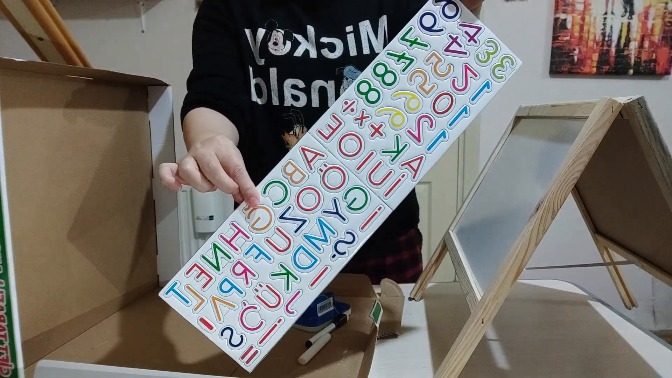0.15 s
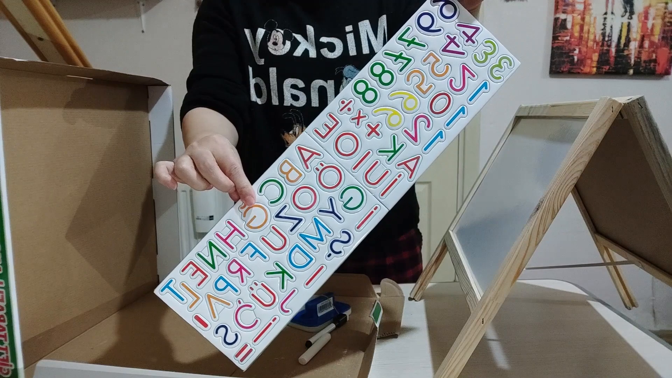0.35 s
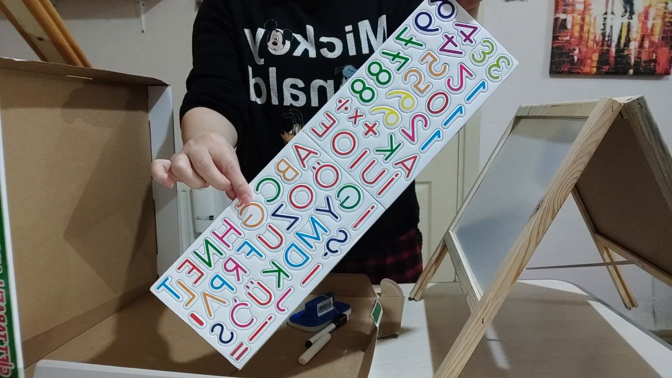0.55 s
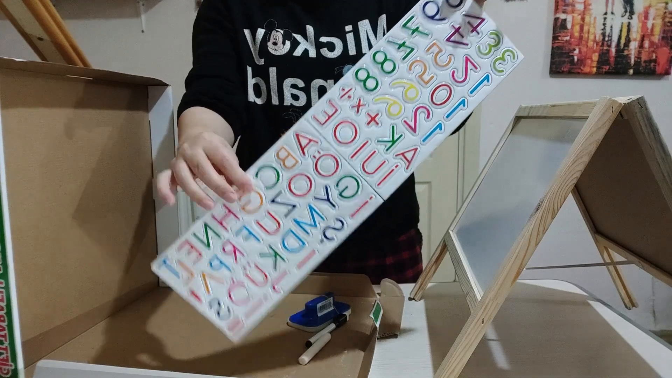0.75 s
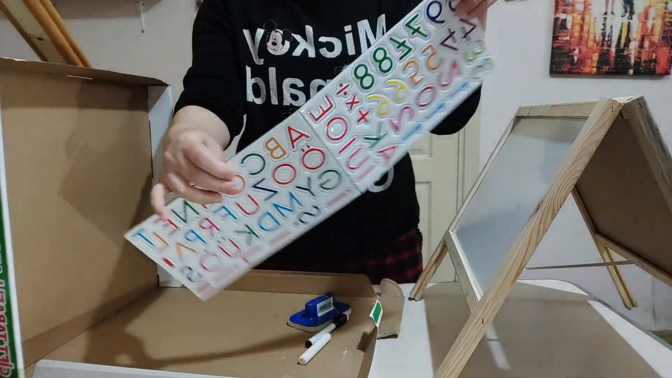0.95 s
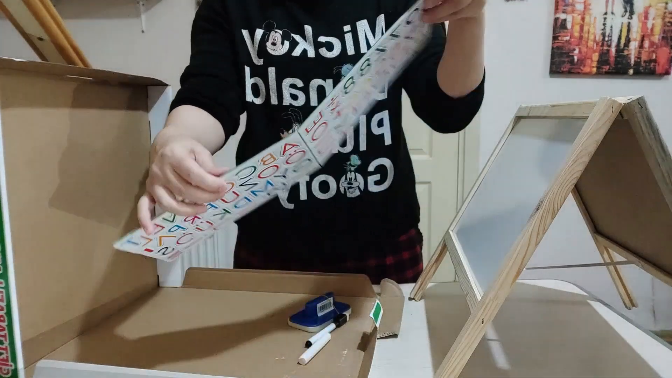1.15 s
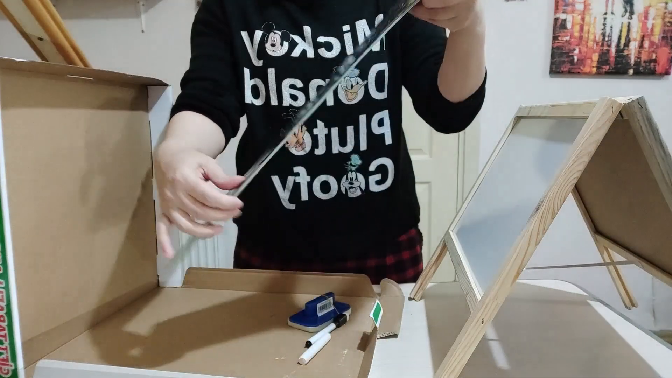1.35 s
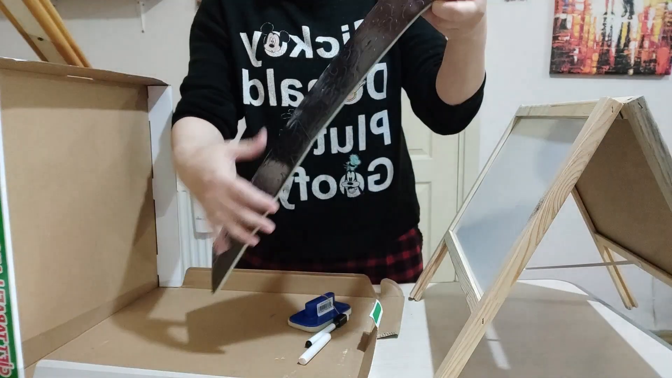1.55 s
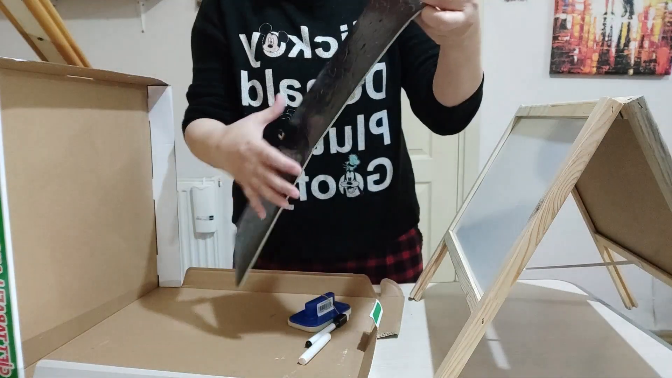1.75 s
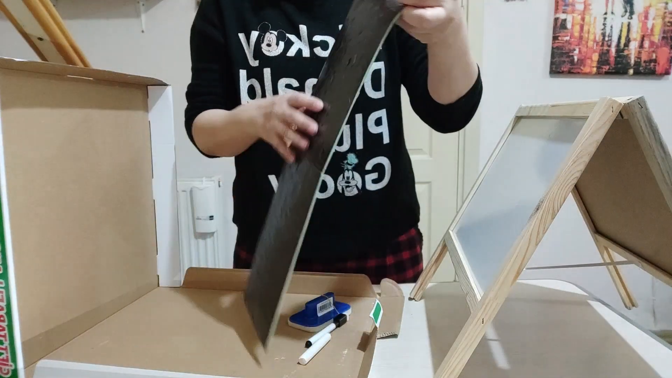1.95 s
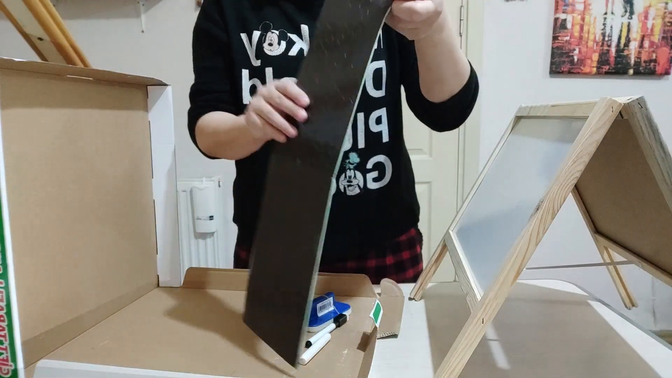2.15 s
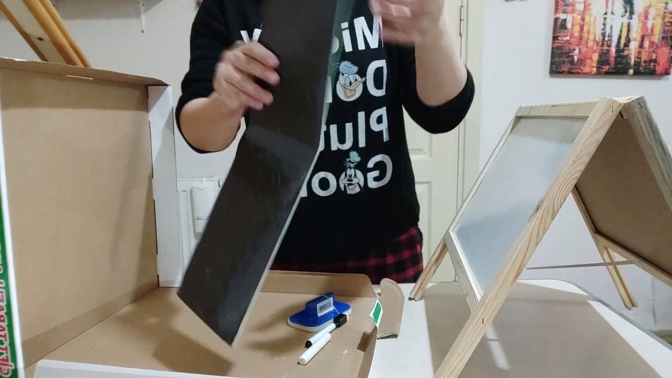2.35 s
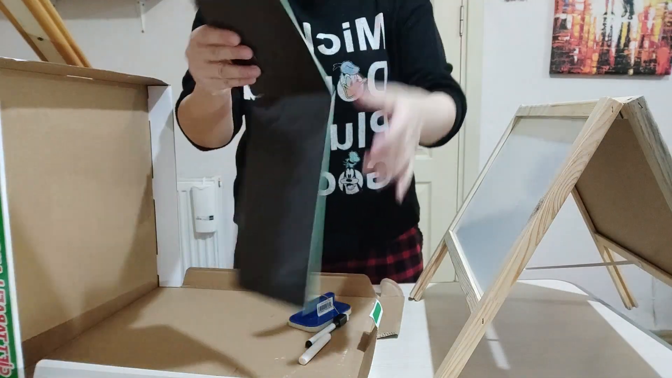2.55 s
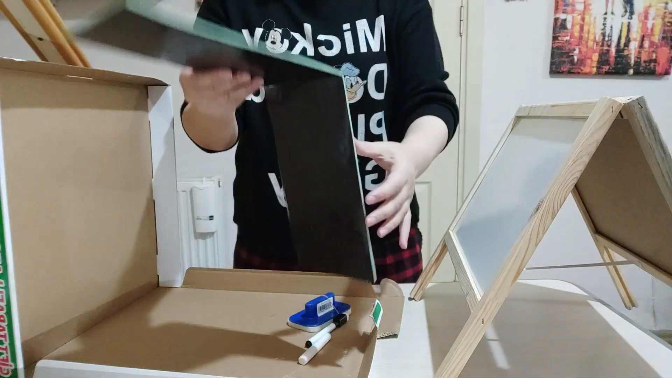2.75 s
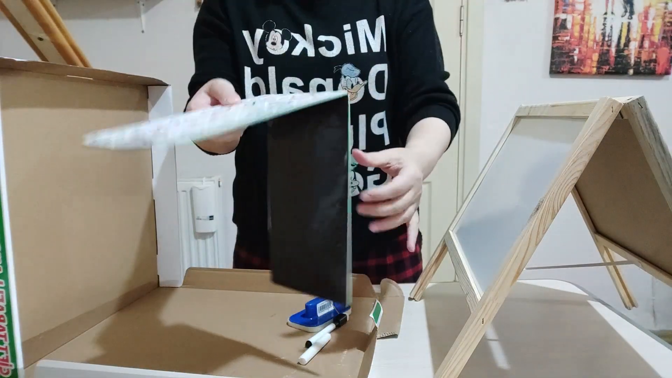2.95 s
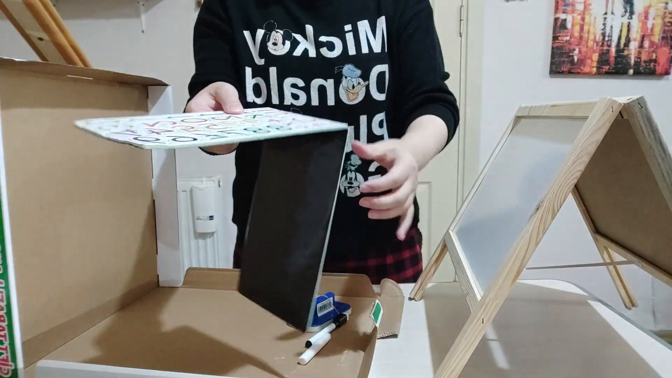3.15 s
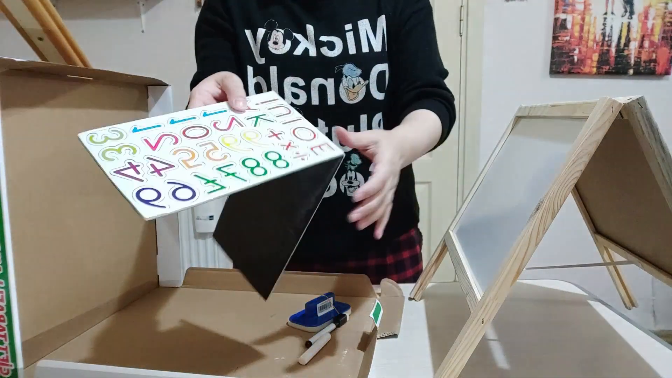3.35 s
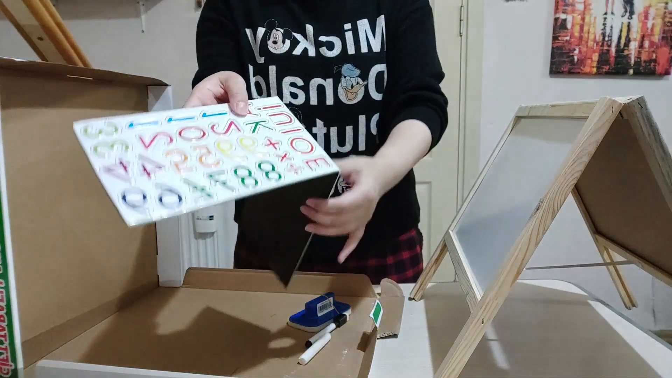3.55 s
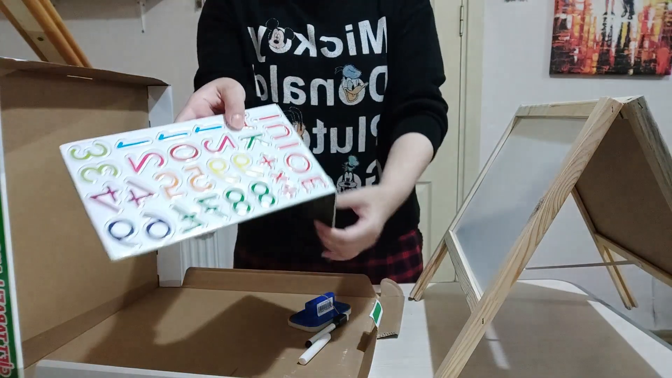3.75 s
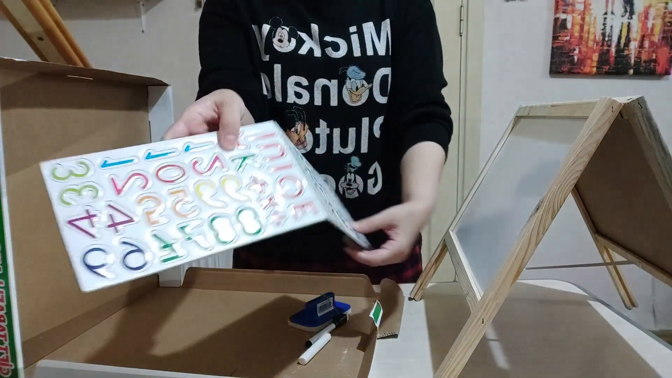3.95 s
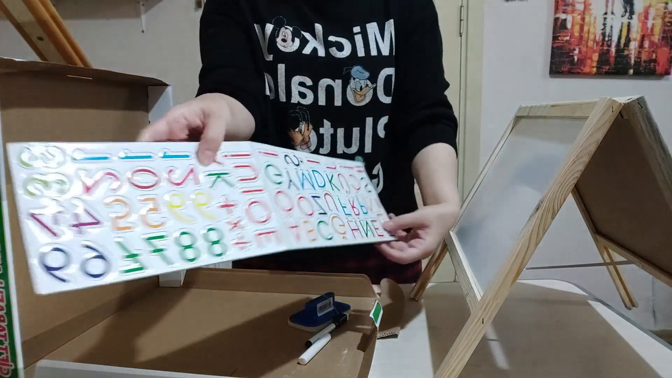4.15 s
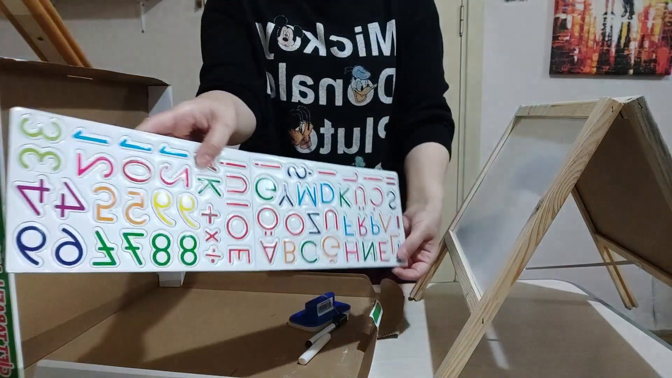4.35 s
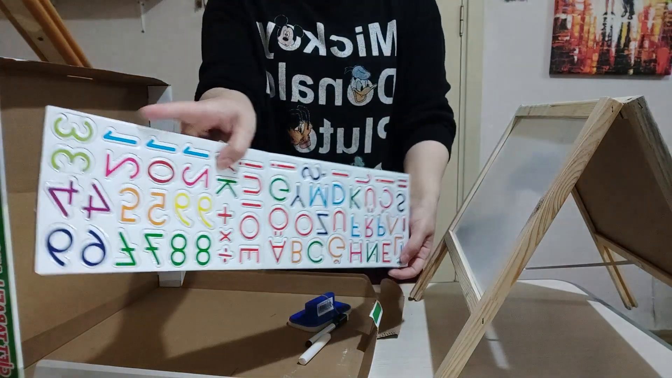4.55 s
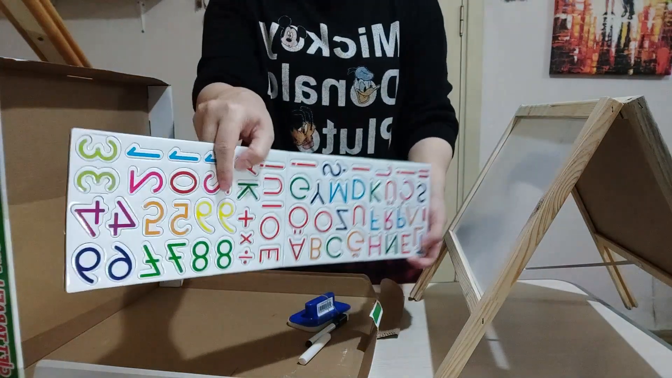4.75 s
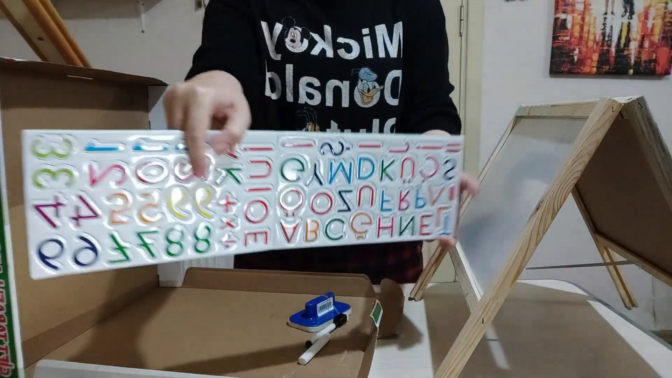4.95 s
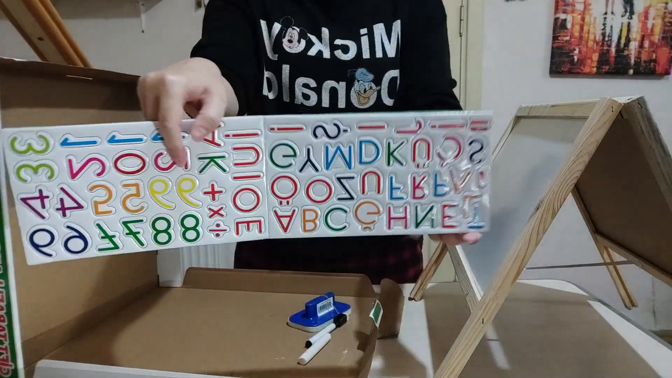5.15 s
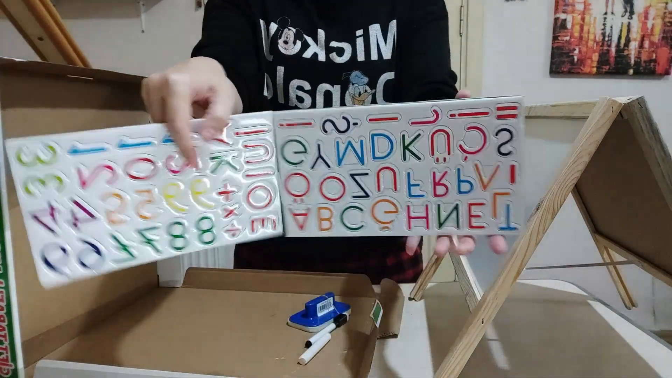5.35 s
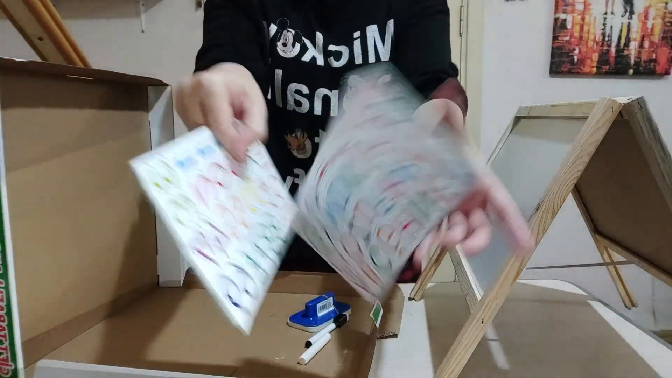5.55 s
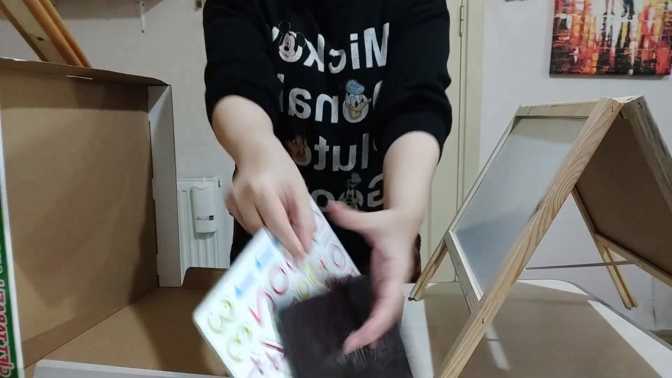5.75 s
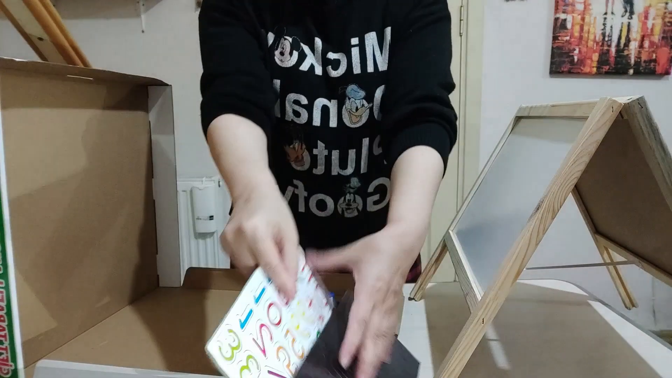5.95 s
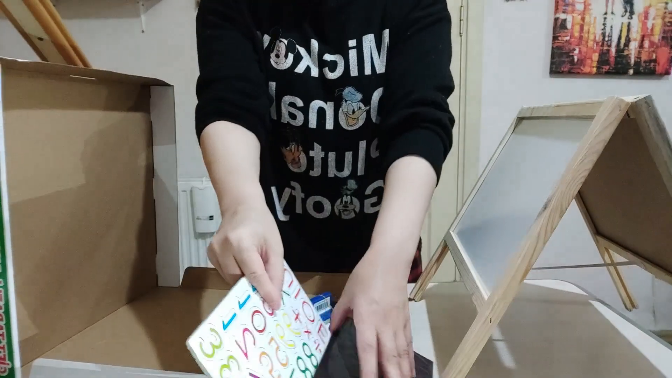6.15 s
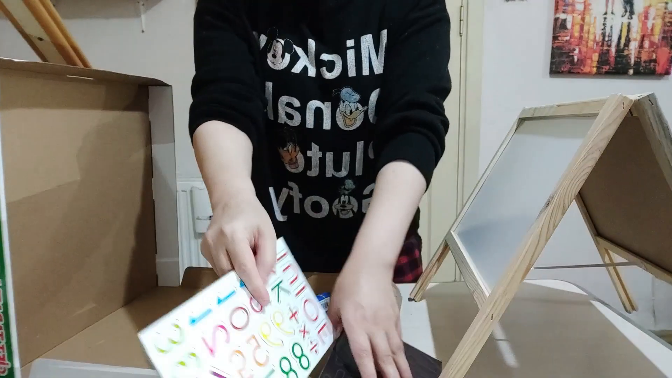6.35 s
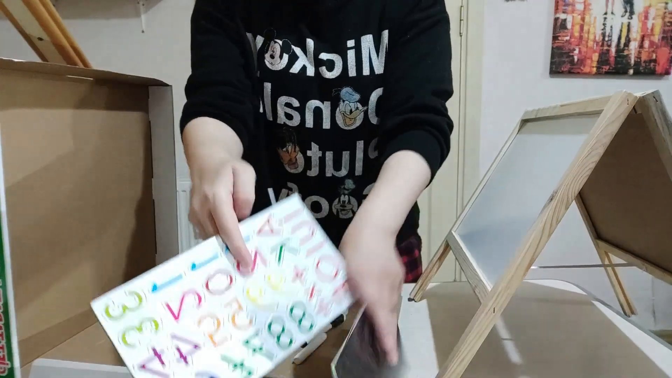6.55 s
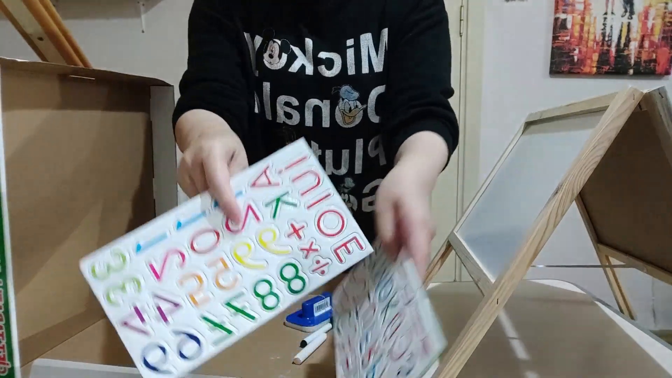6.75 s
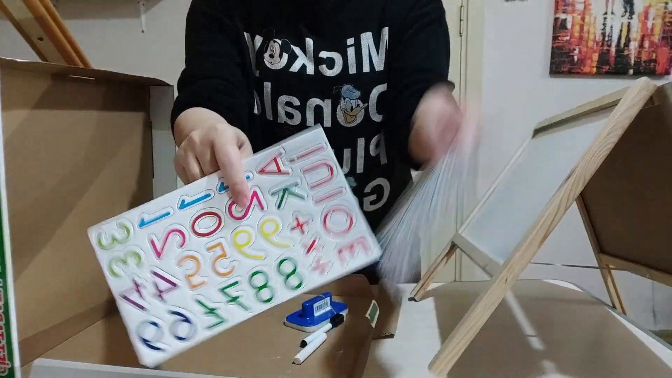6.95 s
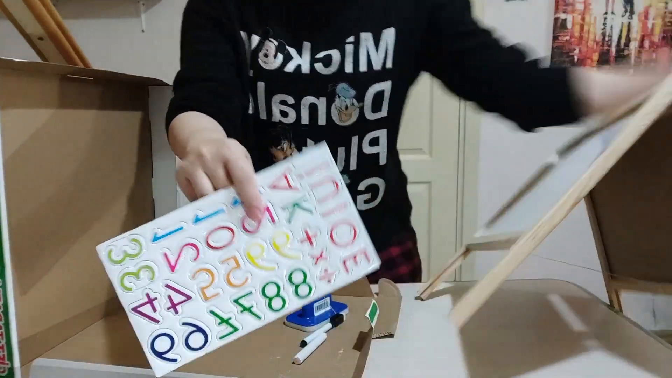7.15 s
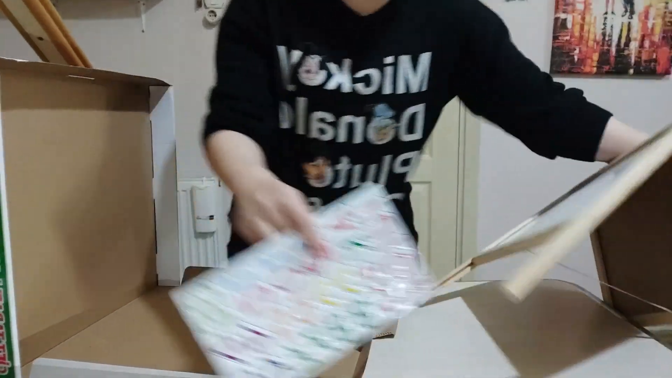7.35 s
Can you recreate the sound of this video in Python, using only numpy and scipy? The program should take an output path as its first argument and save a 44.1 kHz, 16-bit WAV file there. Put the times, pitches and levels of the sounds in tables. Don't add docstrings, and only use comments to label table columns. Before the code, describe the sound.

A flexible sheet is softly handled and ticks, suddenly snaps and thumps onto a cardboard box, slides about, then a wooden easel bumps and cracks.

```python
import sys
import numpy as np
from scipy import signal
from scipy.fft import rfft, irfft, next_fast_len
from scipy.io import wavfile
from scipy.ndimage import uniform_filter1d, minimum_filter1d

SR = 44100
rng = np.random.default_rng(int(sys.argv[2]) if len(sys.argv) > 2 else 0)


def gain_from_db(level_db):
    decades = np.asarray(level_db, float) / 20
    return 10 ** decades


def waveform_to_disk(signal):
    frames = np.transpose(np.atleast_2d(signal))
    scaled = np.clip(frames, -1, 1) * 32767
    samples = np.round(scaled).astype(np.int16)
    wavfile.write(sys.argv[1], SR, samples)


N = 326340

# peak time in seconds, hiss level in dB, rise in seconds, fall in seconds, extra brightness in dB.
AIR_STROKES = [(0.96, -69.5, 0.11, 0.065, -7), (1.075, -64, 0.044, 0.042, 2.5),
               (1.17, -63, 0.15, 0.13, -1.5), (1.3, -67.5, 0.084, 0.12, 4.5), (1.62, -71, 0.68, 0.95, -0.5),
               (2.04, -68, 0.069, 0.25, 1.5), (2.12, -65.5, 0.038, 0.078, -4), (2.36, -62, 0.1, 0.06, 0),
               (2.799, -63, 0.052, 0.069, -1.5), (3.3, -73.5, 0.11, 0.42, 4), (3.42, -64, 0.027, 0.12, -16),
               (3.74, -71.5, 0.056, 0.089, 2.5), (4.05, -67.5, 0.72, 0.17, -1.5),
               (4.136, -63.5, 0.038, 0.11, 4.5), (4.252, -66.5, 0.04, 0.048, 10.5),
               (4.48, -73, 1, 0.26, -4), (4.62, -61.5, 0.23, 0.065, -4), (4.724, -67, 0.094, 0.12, -6),
               (4.85, -73, 0.096, 0.18, 12.5), (4.93, -57.5, 0.11, 0.082, -2),
               (5.052, -60.5, .04, 0.18, -5), (5.314, -63.5, 0.39, 0.18, -0.5)]
BOX_STROKES = [(5.445, -41, 0.016, 0.083, -9.5), (5.5, -48, 0.057, 0.027, 3),
               (5.577, -55, 0.12, 0.011, 11.5), (5.656, -55, 0.094, 0.13, 6),
               (5.801, -34, 0.004, .014, -26), (5.819, -57, 0.014, 0.98, 10),
               (5.922, -38, 0.042, 0.054, -20), (6.0, -53.5, 0.11, .3, -20), (6.106, -54.5, 0.12, 0.35, -9),
               (6.27, -58.5, 0.11, 0.12, 4.5), (6.378, -61, 0.003, 0.022, 15.5),
               (6.42, -65, 0.032, 0.99, 6.5), (6.61, -58, 0.045, 0.086, 4),
               (6.637, -52.5, 0.037, 0.054, -11), (6.711, -53.5, 0.032, 0.0071, -27),
               (6.796, -44.5, 0.05, 0.0077, -5.5), (6.817, -57, 0.059, 0.086, 0),
               (7.061, -45, 0.0061, 0.029, -7.5), (7.115, -46, 0.057, 0.11, -2),
               (7.2, -39, 0.0028, 0.15, -3), (7.325, -43.5, 0.029, 0.071, 5),
               (7.359, -49, 0.0052, 0.082, 6)]
AIR_ROUNDNESS, ROUNDNESS = 1.4, 0.96
# frequency in Hz, level in dB per Hz.
RUB_COLOUR = [(1180, -58), (2000, -13.5), (2930, -12), (3170, -10.5), (4900, -0.5), (5730, -9),
              (6040, -12.5), (6360, -14.5), (7980, -12.5), (9010, -25), (9830, -26), (12400, -33.5),
              (14900, -29.5), (16000, -66)]
# peak time in seconds, scrape level in dB, rise in seconds, fall in seconds.
DRAGS = [(2.36, -68.5, 0.13, .06), (3.42, -61, 0.012, 0.078), (4.636, -62, 0.071, 0.012),
         (4.724, -62.5, 0.047, 0.014), (4.86, -66, 0.055, .1), (4.93, -60.5, 0.12, 0.031),
         (5.03, -60, 0.0072, 0.04), (5.314, -58, .12, 0.032), (5.4465, -33.5, 0.0027, 0.015),
         (5.578, -61, 0.31, 0.033), (5.805, -40.5, 0.0037, 0.13), (5.85, -52, 0.029, .2),
         (5.93, -40.5, 0.0092, 0.069), (6.064, -52, 0.14, 0.023), (6.12, -56, .01, 0.47),
         (6.286, -55.5, 0.47, 0.14), (6.379, -50, 0.0061, 0.022), (6.4, -56.5, .02, 0.44),
         (6.74, -50, 0.011, 0.12), (6.798, -46.5, 0.082, 0.1), (7.12, -55.5, 0.094, 0.42),
         (7.2, -43, 0.0051, 0.13), (7.345, -30.5, 0.042, 0.065)]
# frequency in Hz, level in dB per Hz.
SCRAPE_COLOUR = [(290, -18), (500, -16), (793, -1), (1680, -8.5), (2180, -8), (3300, -11), (4000, -10),
                 (5200, -18.5), (8800, -120)]
# start in seconds, level in dB, pitch in Hz, length in seconds.
SQUEAKS = [
    (2.783, -53, 5140, 0.033),
    (6.11, -49.5, 4900, 0.033),
    (6.119, -49, 870, 0.046),
    (6.299, -56, 2536, 0.046),
    (6.384, -55.5, 870, 0.012),
]
# start in seconds, level in dB, pitch in Hz, length in seconds.
CHAFES = [(0.943, -67.5, 4070, 0.029), (1.054, -63, 5100, 0.037), (1.15, -65, 5500, 0.068),
          (1.247, -64.5, 5200, .06), (2.798, -62, 5000, 0.033), (4.59, -54.5, 4600, 0.055),
          (4.12, -54, 5400, 0.037), (5.291, -53.5, 4500, 0.026), (5.473, -37.5, 5160, 0.017),
          (5.5, -41, 5000, 0.025), (5.475, -43, 6600, .02), (5.507, -45, 6300, .02),
          (5.628, -47, 7890, 0.013), (5.65, -54, 7900, .02), (5.924, -43, 4950, 0.011),
          (6.602, -49, 5340, .015), (6.639, -45.5, 4400, 0.024), (6.699, -54, 4540, 0.02),
          (6.783, -42, 4500, 0.021), (7.058, -48.5, 4570, .018), (7.1015, -50, 4300, 0.018),
          (7.123, -45, 4770, 0.025), (7.224, -37, 4490, 0.014), (7.365, -32, 7700, 0.01)]
SQUEAK_WIDTH_HZ, CHAFE_WIDTH_HZ = 70, 270
# time in seconds, peak level in dB, pitch in Hz.
TICKS = [
    (2.1266, -45, 4360),
    (2.3582, -40, 4560),
    (2.7659, -51.5, 5010),
    (2.795, -54, 5190),
    (3.4097, -37, 5700),
    (3.413, -46, 5490),
    (4.1362, -47.5, 5270),
    (5.028, -56, 4600),
    (5.309, -41, 4600),
]
TICK_BROAD_DB, TICK_SIDE_DB = -11, -2.5
# time in seconds, peak level in dB, favoured pitch in Hz,
# level of the broad colour in dB, left over right in dB.
SLAPS = [(5.4265, -21.5, 4190, 19, -4), (5.4448, -39, 4160, 4, -1), (5.512, -34.5, 5600, -28, -11),
         (5.6202, -34.5, 8400, -23, -3), (5.6646, -39, 7840, -35, -14), (5.7975, -24.5, 1840, -25, 0),
         (5.8226, -16.5, 7780, -6.5, -2.5), (5.8587, -25, 7800, -7, -5), (5.9247, -29, 5010, 5, -2),
         (6.3787, -47, 7600, -14, -16), (6.6201, -40.5, 4480, -19, -7), (6.7284, -59, 3420, -10, 0),
         (6.7507, -41.5, 4850, -12, -13), (6.7908, -40, 4540, -19, -10), (7.0584, -46, 4570, -2, -6),
         (7.198, -28, 4500, 4, 5.5), (7.226, -27, 4400, 13, 15.5), (7.3293, -23, 4910, 7, 3)]
# frequency in Hz, level in dB per Hz.
SNAP_COLOUR = [(290, -10.5), (500, -11), (906, -9.5), (2190, -14), (4210, -5.5), (5550, -7), (6230, -10),
               (7980, -4.5), (8830, -16.5), (10500, -26), (12900, -24), (16000, -48)]
SNAP_T60_S, SNAP_SLOPE = 0.026, 0.072
# time in seconds, peak level in dB, lowest pitch in Hz, highest pitch in Hz.
CLICKS = [(5.4135, -45.5, 400, 2500), (5.426, -24, 900, 9000), (5.4452, -24.5, 900, 5000),
          (5.6192, -45, 600, 9000), (5.7972, -25.5, 1490, 6000), (5.823, -28, 2500, 9000),
          (5.8748, -28, 5000, 9000), (5.9128, -32, 1500, 6000), (5.9267, -27.5, 700, 5000),
          (6.0289, -46, 3000, 8900), (6.1155, -41, 600, 5000), (6.169, -55, 4000, 14000),
          (6.3804, -44, 1070, 9000), (6.73, -52, 1500, 4000), (6.8391, -44, 3000, 7000),
          (7.0586, -47, 3000, 12000), (7.1987, -28, 700, 12000), (7.3276, -24, 1500, 6000),
          (2.796, -47, 3500, 8000), (2.1268, -47, 2500, 8000), (4.636, -51, 1500, 9000),
          (7.334, -30, 900, 5000), (5.0291, -53, 900, 5970)]
CLICK_T60_S, CLICK_TAIL_DB = 0.011, -13
# time in seconds, peak level in dB, pitch of the struck spot in Hz,
# its time to fall 60 dB in seconds, level of the box ring in dB.
KNOCKS = [(2.358, -60, 400, .05, -16), (3.411, -50, 1000, 0.027, -47), (5.027, -53, 350, 0.032, -16),
          (5.301, -47, 140, 0.051, -8), (5.4255, -23, 350, 0.027, -20), (5.4455, -32, 825, 0.0036, -24),
          (5.796, -24, 446, 0.042, -16), (5.801, -24, 215, 0.068, -2.5), (5.888, -29.5, 216, 0.094, -8),
          (5.9236, -10, 205, 0.033, -7), (5.941, -28.5, 134, 0.14, -3), (5.951, -17, 269, 0.021, -17),
          (5.972, -19, 264.5, 0.065, -32), (5.992, -32, 415.2, 0.26, -15), (6.02, -28.5, 252, 0.077, -10),
          (6.043, -69.5, 420, 0.13, -7), (6.113, -38.5, 460, 0.026, 1.5), (6.301, -48, 267, 0.032, -5),
          (6.382, -51, 850, 0.12, -26), (6.727, -29.5, 435, 0.0076, -17), (6.752, -35, 737, 0.027, -13.5),
          (6.788, -38, 1080, 0.037, -7.5)]
BUMPS = [
    (7.071, -42.5, 394, 0.23, -1.5),
    (7.203, -36, 440, 0.086, 1.5),
    (7.301, -40, 221, 0.078, 1),
    (7.312, -28, 223, 0.07, -22),
    (7.3277, -19.5, 223.4, 0.09, -4.5),
    (7.34, -19, 183, 0.046, -16),
    (7.361, -30, 206, 0.045, -2),
]
MORE_BLOWS = [(5.4259, -30, 1107, 0.016, -25), (5.452, -42, 1250, 0.03, -23), (5.796, -38.5, 78, .15, -25),
              (7.21, -40, 75, 0.16, -20), (5.9245, -22, 405, 0.06, -31), (5.955, -31.5, 755, 0.046, -18),
              (6.03, -43, 640, 0.064, -18), (6.09, -37.5, 230, .08, -15), (6.173, -41, 394, 0.063, -5),
              (6.19, -47, 870, 0.098, -20), (6.2, -42, 223, 0.095, -8), (6.238, -47, 327, 0.057, -15),
              (6.308, -50.5, 862, 0.11, -25.5), (6.378, -47, 1356, 0.045, -25),
              (6.522, -52.5, 463, 0.072, -12), (6.584, -52, 430, 0.065, -5.5), (6.755, -46, 895, 0.044, -20),
              (6.82, -46, 348, 0.04, -8.5), (7.105, -45, 200, .08, -7), (7.2, -44, 810, .06, -22),
              (7.245, -39.5, 398, 0.15, -14), (7.318, -33, 1123, 0.043, -20), (7.334, -25, 590, 0.03, -23)]
OVERTONE_DB, OVERTONE_DB_PER_S = -6, -110
# pitch in Hz, level in dB, time to fall 60 dB in seconds.
BOX = [(119.9, -6.5, 0.18), (142.7, -6, 0.19), (205, -8.5, 0.35), (231, -7.5, 0.13), (269, -8.5, 0.29),
       (330, -5, 0.12), (407.4, -8.5, 0.14), (461.7, -6.5, 0.1), (563.7, -11.5, 0.21), (622.4, -20, 0.3),
       (717, -5, 0.04), (832, -29, 0.092), (870, -31, 0.35)]
# peak time in seconds, rumble level in dB, rise in seconds, fall in seconds.
SHAKE = [
    (5.5, -73, 2.0, 0.9),
    (5.955, -38.5, 0.058, 0.12),
    (6.3, -57, 1.7, 0.54),
    (7.065, -53, 0.0089, 0.45),
    (7.247, -42, 0.12, 0.076),
    (7.337, -36, 0.16, 0.23),
]
# time in seconds, peak level in dB, time to fall 60 dB in seconds.
CRACKS = [
    (7.354, 0, 0.016),
    (7.3562, -14, 0.011),
    (7.3561, -12, 0.021),
    (7.366, -15.5, 0.28),
]
# pitch in Hz, width in Hz, level in dB.
JOINT = [(4500, 84, -5.5), (5500, 140, -4.5), (7780, 180, 1.5), (9740, 97, -7), (11500, 400, -11.5),
         (13800, 280, -14)]
# time in seconds, level in dB.
DRONE = [(3.4, -82), (3.532, -101), (3.616, -82), (3.934, -76), (4.224, -61.5), (4.384, -71.5), (4.88, -65),
         (5.06, -80.5), (5.3, -68)]
# frequency in Hz, level in dB per Hz.
HUSH_COLOUR = [(7.1, -20), (12, 4), (32, -3), (54, -12.5), (85, -11.5), (115, -11.5), (150, -18),
               (350, -26.5), (487, -28.5), (533, -28), (583, -29.5), (1100, -33.5), (2790, -37),
               (7540, -47), (16000, -44)]
HUSH_DB = -58.5
# frequency in Hz, likeness from 0 to 1.
HUSH_SAME = [(60, 0.22), (150, 0.46), (380, 0.072), (950, 0.019), (2380, 0.017), (5980, 0.015),
             (15000, 0.01)]
# frequency in Hz, time to fall 60 dB in seconds.
ROOM = [(150, 0.19), (500, 0.4), (2000, 0.31), (5000, 0.44), (10000, 0.061)]


def evened(x):
    return x / np.sqrt(np.mean(x ** 2) + 1e-20)


def read(points, hz):
    f, value = np.transpose(points)
    return np.interp(np.log(hz + 1), np.log(f + 1), value)


def colour(x, gain_db):
    size = next_fast_len(x.shape[-1])
    gain = gain_from_db(gain_db(np.fft.rfftfreq(size, 1 / SR)))
    return irfft(rfft(x, size) * gain, size)[..., :x.shape[-1]]


def add(mix, s, sound):
    part = mix[:, round(s * SR):][:, :sound.shape[1]]
    part += sound[:, :part.shape[1]]


def pan(db):
    return gain_from_db(np.array([[db / 2], [-db / 2]]))


def strokes(rows, lift_db=0, roundness=ROUNDNESS):
    s, db, rise, fall = np.transpose(rows)[:4, :, None]
    t = np.arange(0, N + 32, 32) / SR
    away = np.where(t < s, (s - t) / rise, (t - s) / fall)
    power = gain_from_db(2 * (db + lift_db - 20 * away ** roundness)).sum(0)
    return np.interp(np.arange(N) / SR, t, np.sqrt(power))


def grit(per_s, spread_db, smooth, same):
    size = gain_from_db(spread_db * np.minimum(rng.exponential(1, N), 4))
    size = size * (rng.random(N) < per_s / SR)
    grains = signal.lfilter([1], [1, -.97], size)
    a, b = rng.standard_normal((2, N))
    both = np.array([a, same * a + np.sqrt(1 - same ** 2) * b])
    return (smooth + evened(grains)) * both


def patchy(x, patchy_db):
    z = signal.stft(x, nperseg=256)[2]
    field = rng.standard_normal(z.shape[:0:-1]).T
    field = evened(uniform_filter1d(uniform_filter1d(field, 4, 0), 12, 1))
    return signal.istft(z * gain_from_db(patchy_db * field), nperseg=256)[1][:, :N]


def rub():
    slides = np.array(AIR_STROKES + BOX_STROKES)
    tops = np.repeat([AIR_ROUNDNESS, ROUNDNESS], [len(AIR_STROKES), len(BOX_STROKES)])[:, None]
    drive = patchy(grit(500, 4.0, 2.2, .5), patchy_db=2.1)
    lower = lambda hz: -10 * np.log10(1 + (hz / 6500) ** 16)
    upper = lambda hz: -10 * np.log10(1 + (6500 / (hz + 1)) ** 16)
    low = evened(colour(drive, lambda hz: read(RUB_COLOUR, hz) + lower(hz)))
    high = evened(colour(drive, lambda hz: read(RUB_COLOUR, hz) + upper(hz)))
    hiss = strokes(slides, roundness=tops) * low
    hiss = hiss + strokes(slides, slides[:, 4:], tops) * high
    card = patchy(grit(340, 2.8, 2.5, 0.32), patchy_db=4.0)
    scrape = evened(colour(card, lambda hz: read(SCRAPE_COLOUR, hz)))
    return gain_from_db(0.5) * hiss + strokes(DRAGS) * scrape


def squeaks():
    out = np.zeros((2, N))
    rows = [(*r, SQUEAK_WIDTH_HZ) for r in SQUEAKS] + [(*r, CHAFE_WIDTH_HZ) for r in CHAFES]
    for s, db, hz, length, width in rows:
        a, b = rng.standard_normal((2, 4096))[:, :round(length * SR)]
        noise = np.array([a, 0.72 * a + 1.05 * b])
        whistle = colour(noise, lambda f: -20 * np.log10(1 + ((f - hz) / width) ** 2))
        add(out, s, gain_from_db(db) * evened(whistle) * np.hanning(len(a)) ** 0.43)
    return out


def snaps():
    out, t = np.zeros((2, N)), np.arange(4096) / SR
    ticks = [(*row, TICK_BROAD_DB, TICK_SIDE_DB) for row in TICKS]
    for s, db, hz, broad_db, side_db in ticks + SLAPS:
        t60 = SNAP_T60_S * (5000 / hz) ** SNAP_SLOPE
        a, b = rng.standard_normal((2, 4096))
        noise = np.array([a, .6 * a + .8 * b])
        peak = lambda f: 1 / (1 + ((f - hz) / 600) ** 2)
        tone = lambda f: read(SNAP_COLOUR, f) + 10 * np.log10(gain_from_db(2 * broad_db) + peak(f))
        shape = gain_from_db(-60 * t / t60) * np.minimum(t / 0.0004, 1)
        add(out, s - .0005, gain_from_db(db - 3.0) * pan(side_db) * evened(colour(noise, tone)) * shape)
    return out


def clicks():
    out, t = np.zeros((2, N)), np.arange(1024) / SR
    noises = rng.standard_normal((40, 2, 1024))
    for (s, db, low_hz, top_hz), noise in zip(CLICKS, noises):
        rattle = gain_from_db(CLICK_TAIL_DB - 60 * t / CLICK_T60_S) * noise
        jolt = rattle - (t == 0)
        band = signal.butter(2, [low_hz, top_hz], "band", fs=SR)
        click = signal.lfilter(*band, jolt)
        add(out, s, gain_from_db(db) * click / abs(click).max())
    return out


def box_ring(t):
    hz, db, t60 = np.transpose(BOX)[:, :, None]
    phases = rng.random((30, 1))[:len(BOX)]
    return (gain_from_db(db - 60 * t / t60) * np.sin(2 * np.pi * (hz * t + phases))).sum(0)


def knocks():
    out, t = np.zeros((2, N)), np.arange(SR // 2) / SR
    for s, db, hz, t60, ring_db in KNOCKS + BUMPS + MORE_BLOWS:
        over_db = OVERTONE_DB + OVERTONE_DB_PER_S * t60
        wave = np.sin(2 * np.pi * hz * t) + gain_from_db(over_db) * np.sin(2 * np.pi * 1.83 * hz * t)
        swell = 1 - np.exp(-(hz * t / 0.32) ** 2)
        thud = -gain_from_db(-60 * t / t60) * wave * swell
        ring = box_ring(t) * (1 - np.exp(-t / 0.0099))
        add(out, s, gain_from_db(db) * np.ones((2, 1)) * (thud + gain_from_db(ring_db) * ring))
    return out


def shake():
    t = np.arange(SR // 4) / SR
    body = box_ring(t) * gain_from_db(-60 * t / 0.046)
    drive = grit(60, 0.44, 1.4, 0.75)
    murmur = signal.oaconvolve(drive, body[None], axes=1)[:, :N]
    dull = colour(murmur, lambda hz: -10 * np.log10(1 + (hz / 550) ** 4))
    return strokes(SHAKE) * evened(dull)


def easel():
    out, t = np.zeros((2, N)), np.arange(4096) / SR
    peaks = lambda f: sum(gain_from_db(2 * db) / (1 + ((f - hz) / (1.3 * w)) ** 2) for hz, w, db in JOINT)
    for s, db, t60 in CRACKS:
        a, b = rng.standard_normal((2, 4096))
        a[8] += 9.0
        noise = np.array([a, 0.78 * np.roll(a, 4) + 0.25 * b])
        burst = evened(colour(noise, lambda f: 10 * np.log10(peaks(f))))
        add(out, s, gain_from_db(db - 15.0) * burst * gain_from_db(-60 * t / t60))
    return out


def drone():
    line = colour(rng.standard_normal(N), lambda hz: -20 * np.log10(1 + ((hz - 126) / 5.0) ** 2))
    s, db = np.transpose(DRONE)
    level_db = np.interp(np.arange(N) / SR, s, db, -120, -120)
    return gain_from_db(level_db) * evened(line)


def hush():
    frames, hz = N // 512 + 5, np.fft.rfftfreq(2048, 1 / SR)
    a, b, c, d, patches = rng.standard_normal((frames, 1025, 5)).T
    patches = evened(uniform_filter1d(uniform_filter1d(patches, 20, 0), 8, 1))
    same = np.clip(read(HUSH_SAME, hz), -1, 1)[:, None]
    left = a + 1j * b
    z = np.array([left, same * left + np.sqrt(1 - same ** 2) * (c + 1j * d)])
    z *= gain_from_db(read(HUSH_COLOUR, hz)[:, None] + 0.6 * patches)
    return gain_from_db(HUSH_DB) * evened(signal.istft(z, nperseg=2048, noverlap=1536)[1][:, :N])


def room(x):
    taps = np.zeros((2, SR // 2))
    at = np.arange(200, SR // 2 - 20, 20)
    at = at + rng.integers(0, 20, (2, len(at)))
    np.put_along_axis(taps, at, rng.choice([-1., 1.], at.shape), 1)
    hz, t, z = signal.stft(taps, SR, nperseg=256)
    tail = signal.istft(z * gain_from_db(-60 * t / read(ROOM, hz)[:, None]), SR, nperseg=256)[1]
    return signal.fftconvolve(x, tail / np.linalg.norm(tail[0]), axes=1)[:, :N]


def scene():
    still = hush() + drone()
    slides = rub() + shake() + squeaks()
    cracks = snaps() + easel() + clicks()
    blows = knocks()
    boom = room(gain_from_db(-11.0) * blows)
    ringing = room(gain_from_db(-12) * cracks + gain_from_db(-16) * slides)
    return still + slides + cracks + blows + ringing + boom + 0.22 * boom[::-1]


def flutter_treble(x, flutter_db, gap_db):
    x = np.pad(x, ((0, 0), (518, 0)))
    hz, t, z = signal.stft(x, SR, nperseg=2048)
    field = evened(uniform_filter1d(rng.standard_normal(z.shape[:0:-1]).T, size=9, axis=0))
    lasting = evened(field + np.roll(field, 1, axis=1))
    treble = np.diff(x.mean(0), prepend=0) ** 2
    now = uniform_filter1d(treble, size=128) + 1e-14
    before = np.roll(uniform_filter1d(treble, size=512), 330) + 1e-14
    jump_db = -minimum_filter1d(10 * np.log10(before / now), size=1800)[::1024]
    calm = np.clip((13 - np.resize(jump_db, len(t))) / 4, 0, 1)
    level_db = 10 * np.log10((abs(z[:, 150:400]) ** 2).mean((0, 1)) + 1e-20)
    busy = np.clip((level_db - np.median(level_db)) / 10, 0, 1)
    flutter = flutter_db * np.maximum(field, 0) ** 2
    gaps = gap_db * busy * np.clip((lasting - .9) / .5, 0, 1)
    toward_treble = np.clip(hz / 3000, 0, 1)[:, None] ** 2
    z = z * gain_from_db(-calm * (flutter + gaps) * toward_treble)
    return signal.istft(z, nperseg=2048)[1][:, 518:][:, :N]


def band_limit(x):
    return signal.sosfilt(signal.butter(12, 16850, fs=SR, output="sos"), x)


def record(dry):
    late = np.array([gain_from_db(-.8) * np.pad(dry[0], (3, 0))[:N], dry[1]])
    low_pass = signal.firwin(511, 15830, window=("kaiser", 9), fs=SR)
    limited = signal.oaconvolve(late, low_pass[None], "same")
    fluttering = flutter_treble(limited, flutter_db=4.0, gap_db=22)
    return band_limit(fluttering)


dry = scene()
out = record(dry)
waveform_to_disk(out)
```